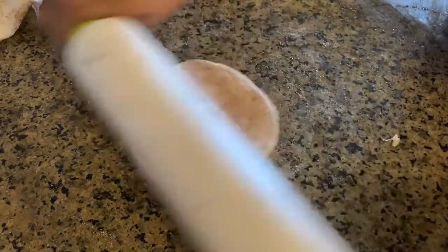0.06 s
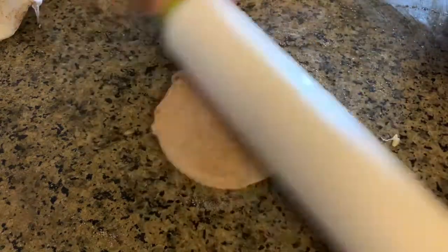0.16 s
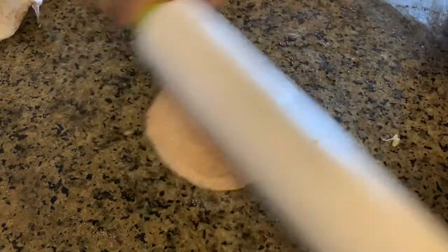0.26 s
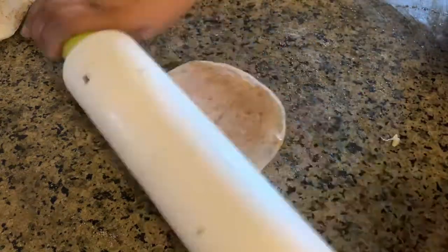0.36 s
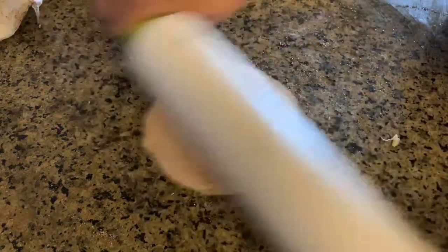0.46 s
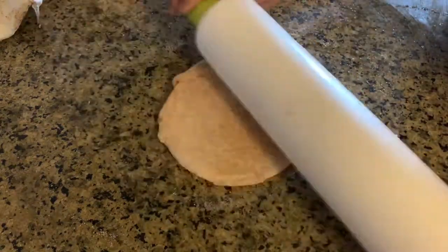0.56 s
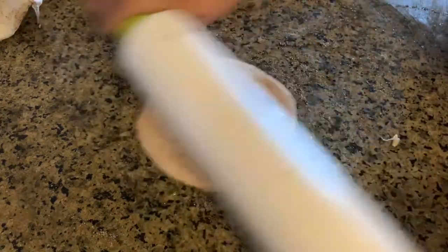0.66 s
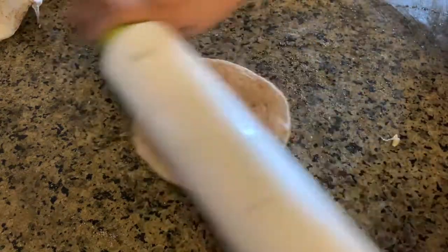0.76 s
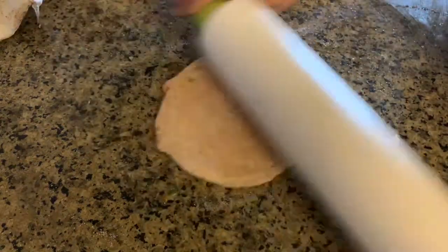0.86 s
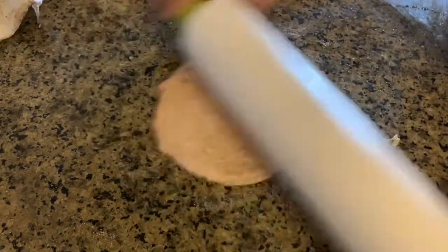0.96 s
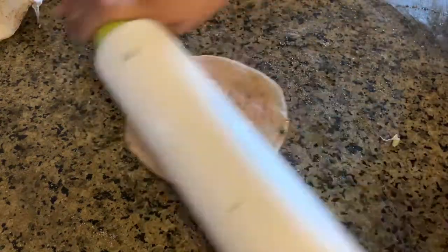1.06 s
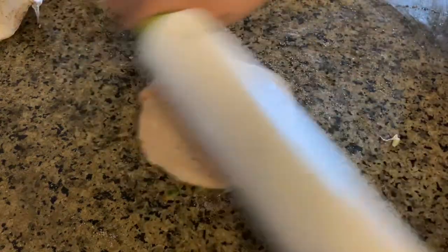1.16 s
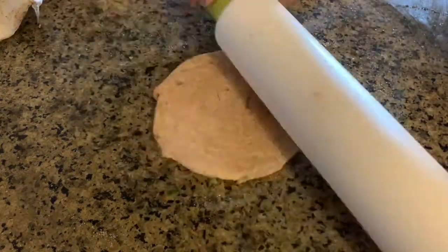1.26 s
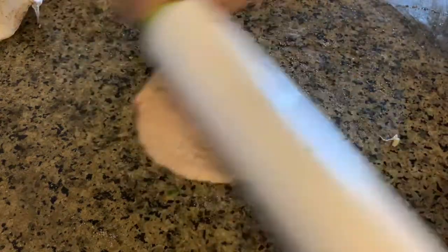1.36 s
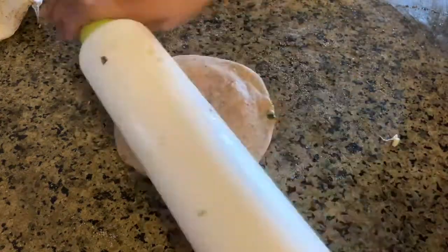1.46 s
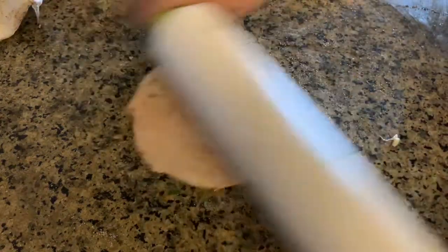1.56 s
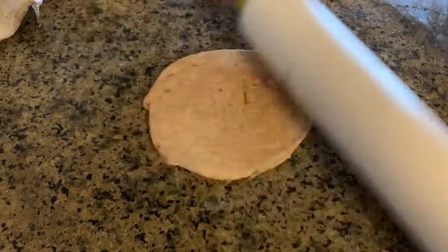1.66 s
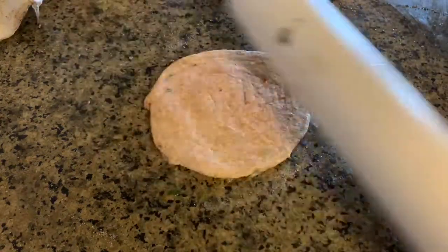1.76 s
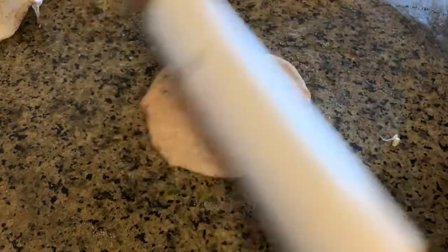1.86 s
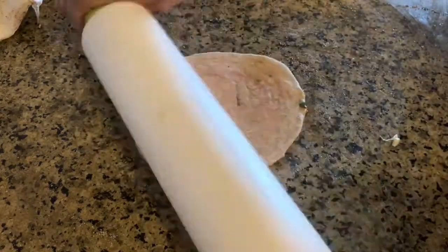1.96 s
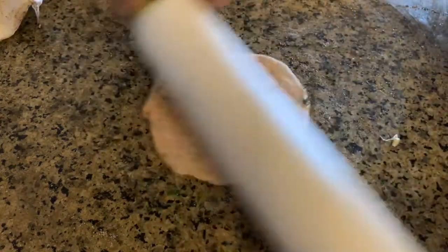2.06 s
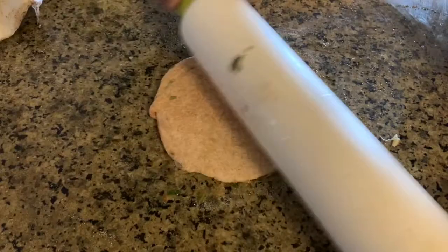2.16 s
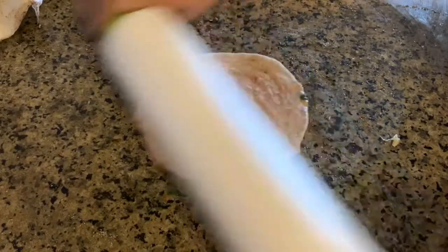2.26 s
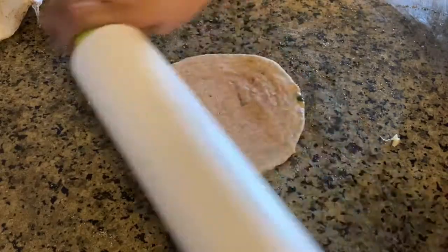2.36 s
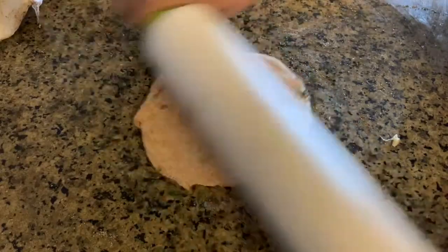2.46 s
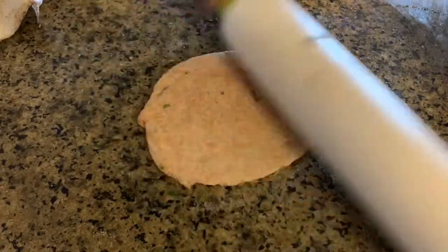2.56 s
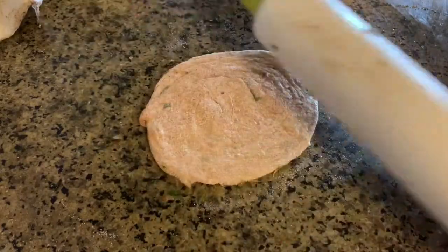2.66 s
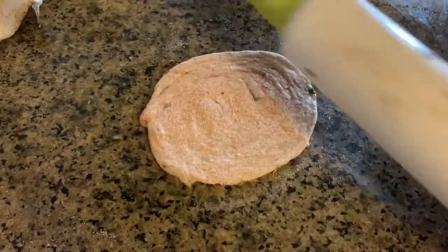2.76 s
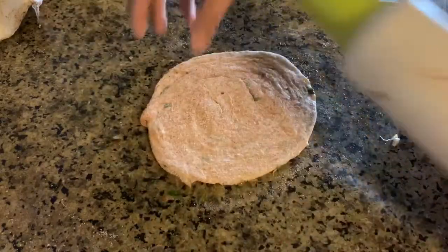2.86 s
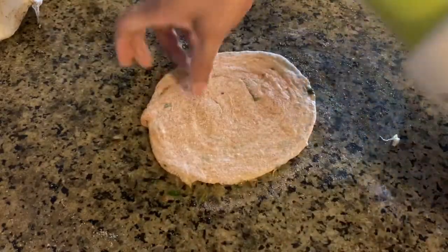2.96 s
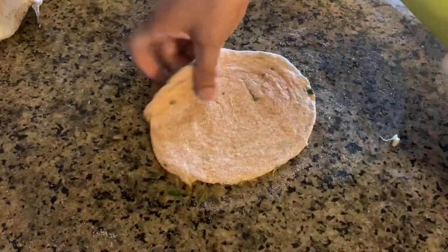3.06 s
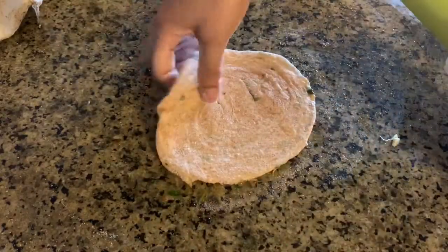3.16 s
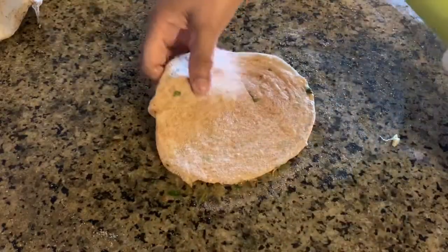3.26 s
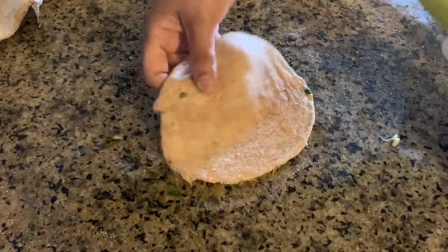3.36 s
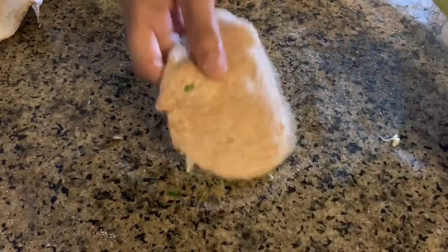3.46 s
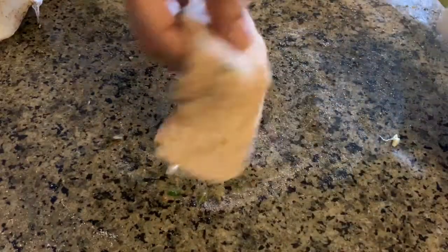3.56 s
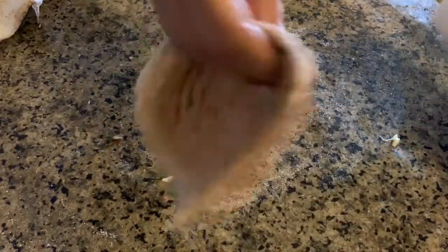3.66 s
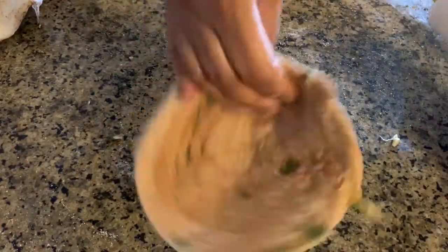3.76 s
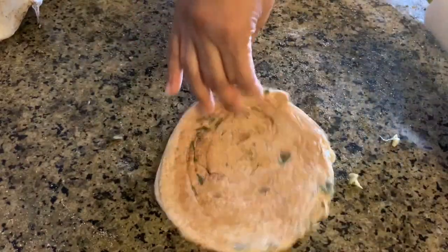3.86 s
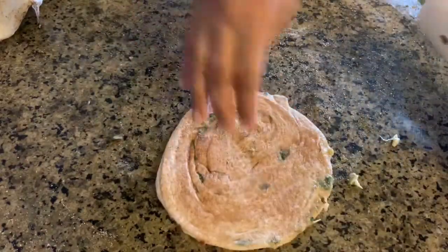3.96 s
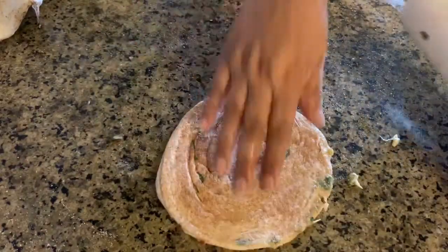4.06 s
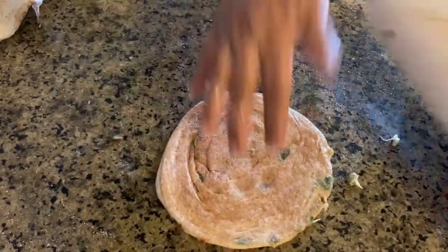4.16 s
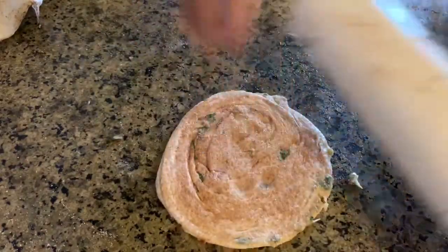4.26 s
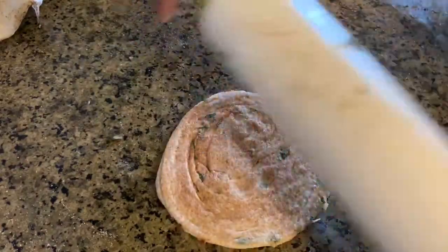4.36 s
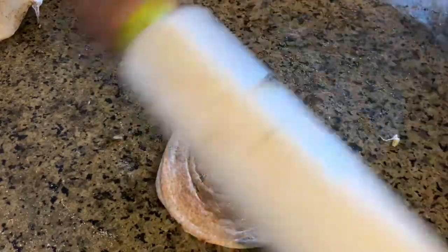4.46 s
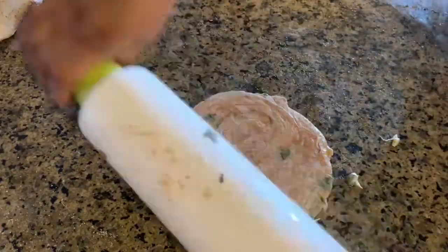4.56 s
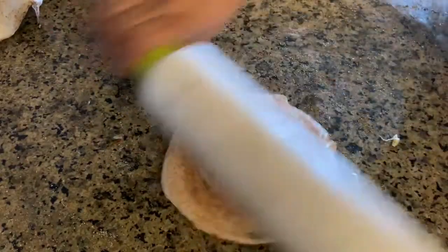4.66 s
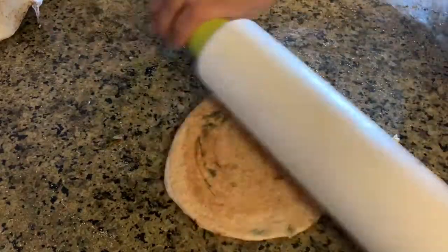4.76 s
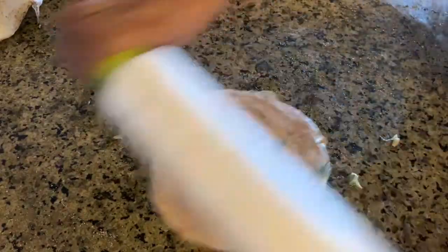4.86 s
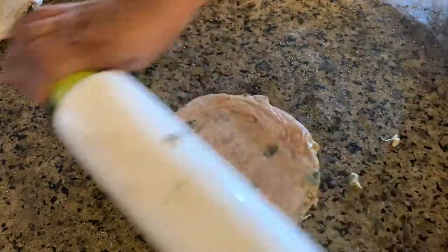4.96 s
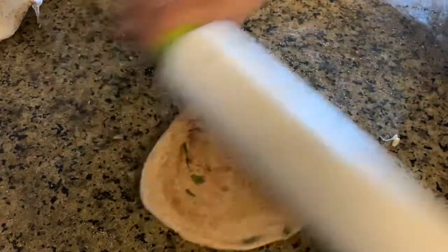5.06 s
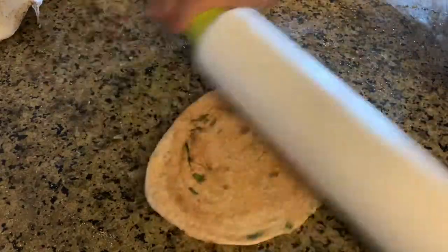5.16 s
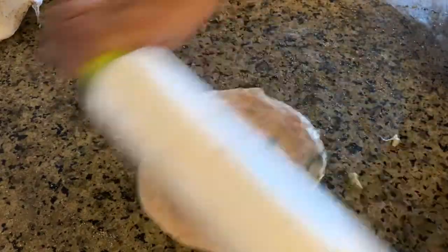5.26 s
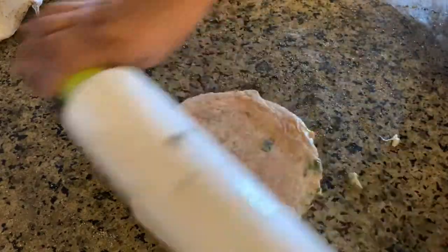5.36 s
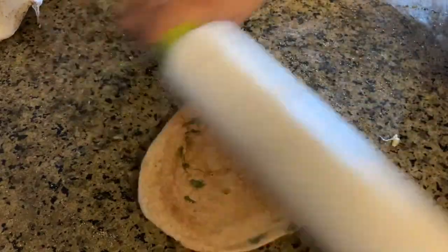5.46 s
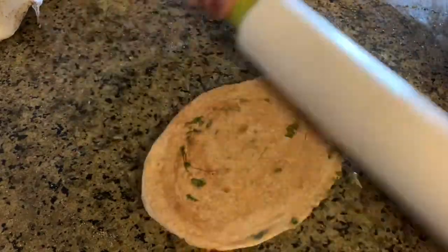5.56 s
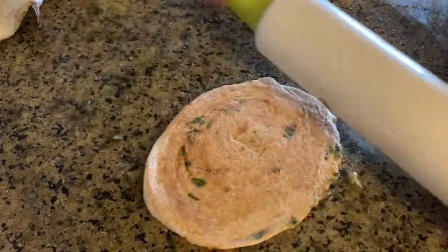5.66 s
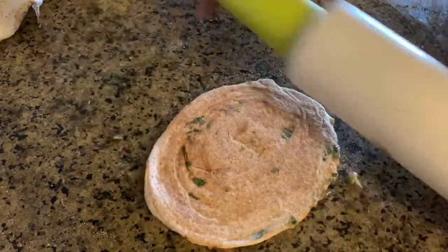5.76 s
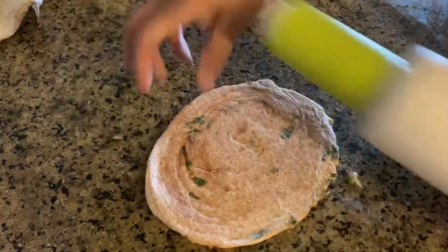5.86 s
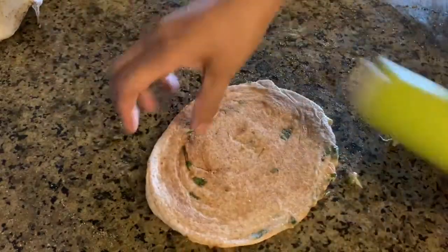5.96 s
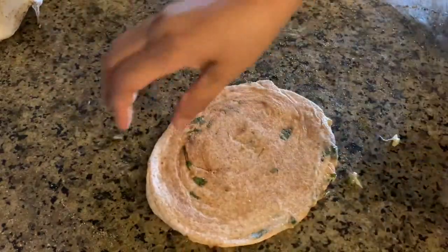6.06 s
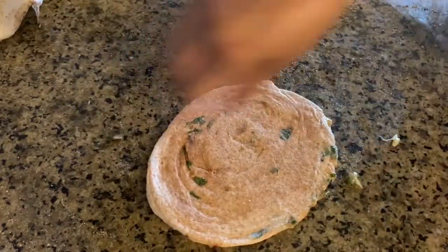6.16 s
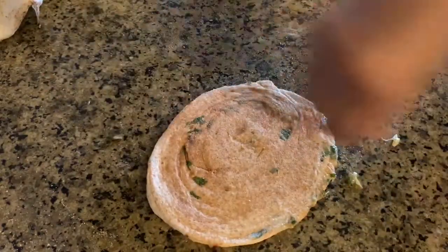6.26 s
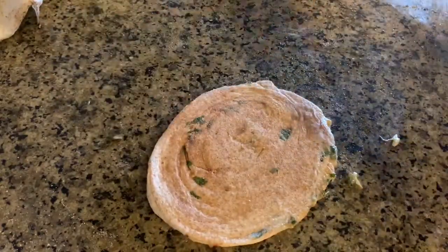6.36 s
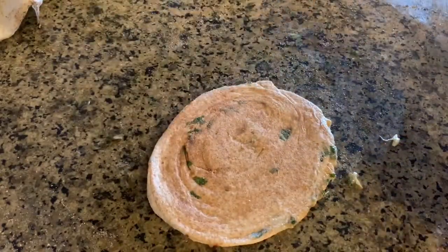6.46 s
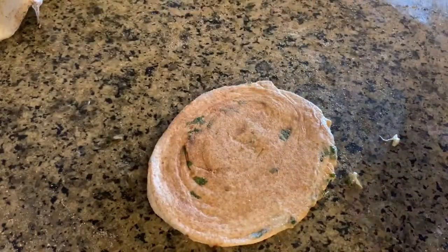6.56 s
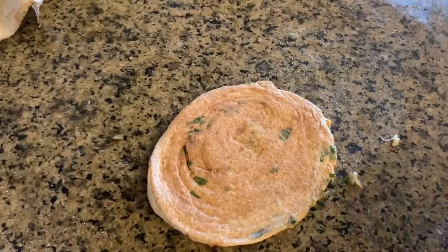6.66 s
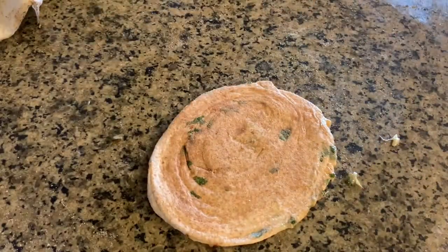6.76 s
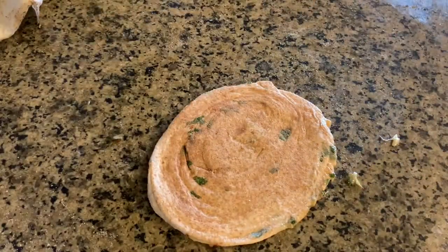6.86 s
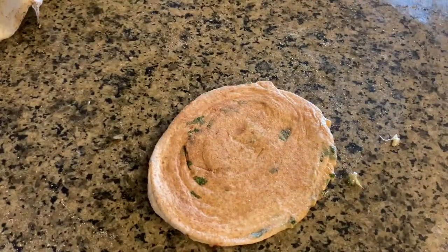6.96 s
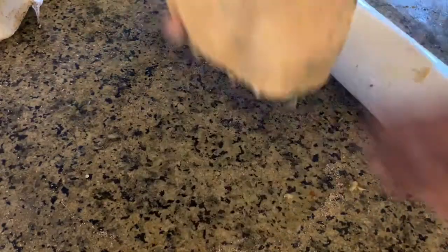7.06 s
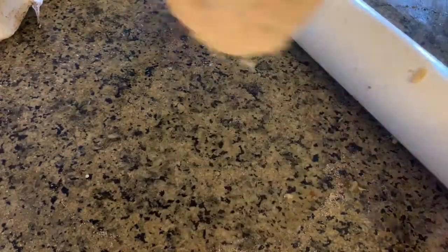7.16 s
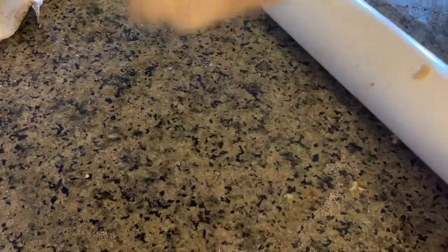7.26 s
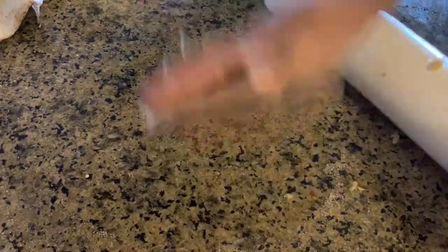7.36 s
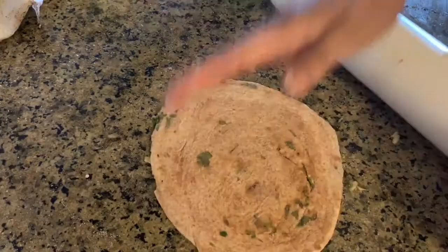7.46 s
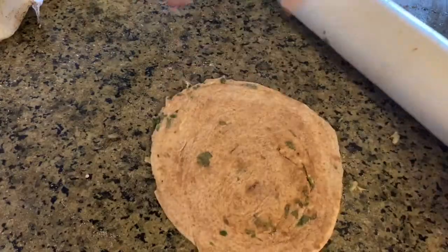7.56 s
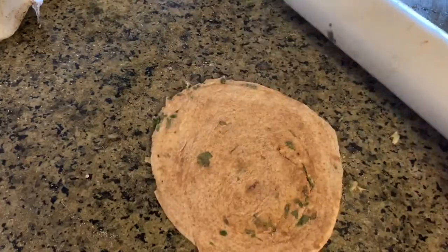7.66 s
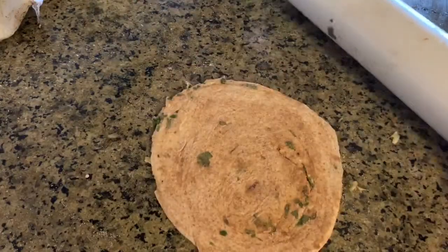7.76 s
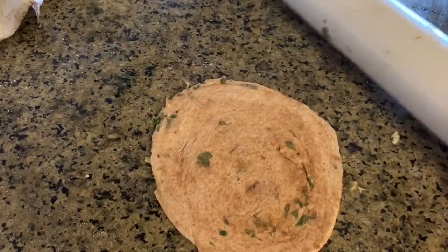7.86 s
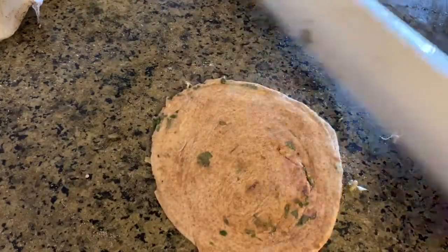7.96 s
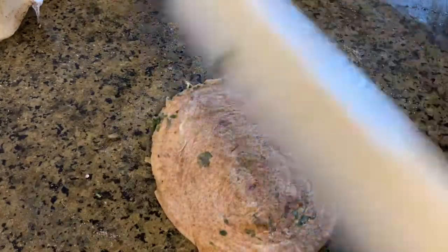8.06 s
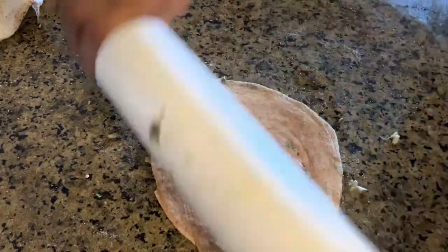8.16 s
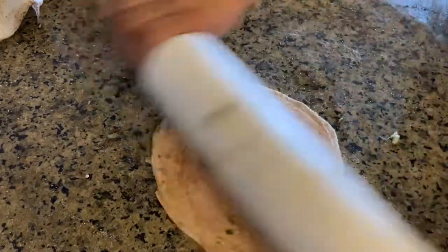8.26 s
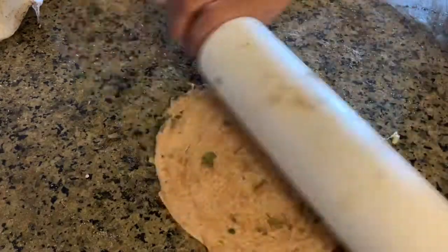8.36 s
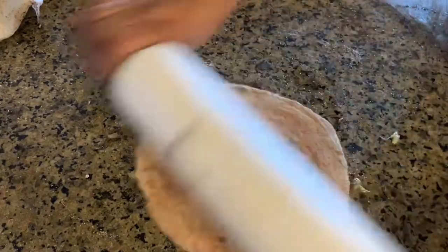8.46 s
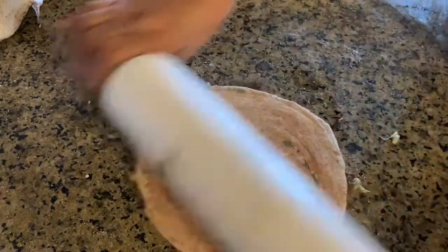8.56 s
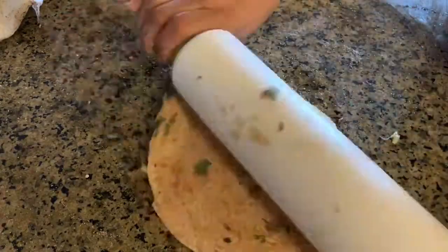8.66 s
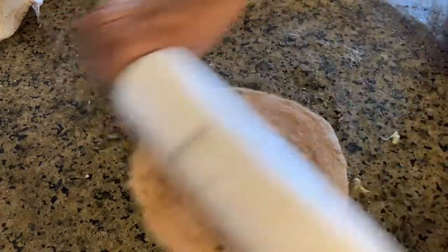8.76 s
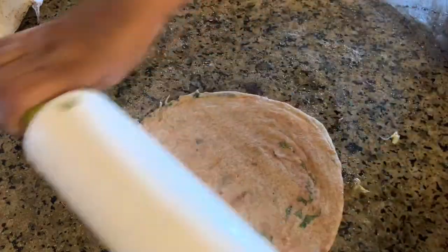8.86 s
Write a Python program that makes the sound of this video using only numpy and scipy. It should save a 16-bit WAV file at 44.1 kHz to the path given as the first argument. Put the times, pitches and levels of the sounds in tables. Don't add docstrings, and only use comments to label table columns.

```python
import sys
import numpy as np
from scipy import signal
from scipy.fft import rfft, irfft, next_fast_len
from scipy.io import wavfile
from scipy.ndimage import uniform_filter1d

SR = 44100
rng = np.random.default_rng(int(sys.argv[2]) if len(sys.argv) > 2 else 0)


def nominal_scale(level):
    x = np.asarray(level, float) / 20
    return 10 ** x


def put_to_file(sound):
    columns = np.atleast_2d(sound).T
    safe = np.clip(columns, -1, 1)
    whole_steps = np.round(safe * 32767)
    wavfile.write(sys.argv[1], SR, whole_steps.astype(np.int16))


N = 392490

# start_s, end_s, hiss_db
STROKES = [(-.1, 0.08, -49), (0.068, 0.237, -45), (0.235, 0.411, -47.5), (.41, 0.583, -47),
           (0.595, 0.767, -48.5), (0.767, 0.942, -45), (0.945, 1.129, -48.5), (1.124, 1.318, -44.5),
           (1.308, 1.509, -47.5), (2.016, 2.181, -46.5), (2.181, 2.381, -46.5), (4.403, 4.512, -57.5),
           (4.612, 4.794, -46), (4.802, 4.983, -45), (4.99, 5.182, -43), (5.173, 5.378, -46.5),
           (8.208, 8.378, -47), (8.372, 8.542, -46.5), (8.543, 8.7, -49), (8.7, 8.916, -46.5)]
# start_s, fastest_s, end_s, hiss_db
RUN_OUTS = [
    (1.508, 1.563, 1.812, -46),
    (1.869, 1.886, 2.01, -43.5),
    (2.402, 2.482, 2.665, -45.5),
    (2.57, 2.73, 2.81, -55.5),
    (5.386, 5.474, 5.695, -47),
    (5.58, 5.758, 5.785, -55.5),
    (7.724, 7.799, 7.835, -51.5),
]
# start_s, fastest_s, end_s, hiss_db
PEELS = [
    (2.7, 3.3, 4.7, -80),
    (3.7, 3.875, 4.1, -59),
    (4.48, 4.57, 4.95, -65.5),
    (7.265, 7.28, 7.42, -59.5),
    (7.8, 7.9, 8.9, -65.5),
]
# start_s, firmest_s, end_s, level_db
CONTACT = [
    (-.3, .6, 1.6, -55),
    (1.45, 1.69, 1.86, -50),
    (1.8, 2.1, 2.46, -54),
    (4.6, 4.78, 5.5, -53),
    (8.15, 8.43, 8.7, -53),
    (8.6, 8.9, 9.2, -53),
    (2.42, 2.61, 2.78, -53),
    (4.38, 4.45, 4.62, -70),
    (5.3, 5.63, 5.77, -52),
    (7.71, 7.83, 8.16, -59),
]
# start_s, heaviest_s, level_db
LUMPS = [(0.096, 0.162, -32), (0.483, 0.527, -28), (0.816, 0.889, -30), (1.129, 1.235, -30),
         (1.543, 1.607, -30.5), (1.67, 1.72, -48), (1.871, 1.898, -28.5), (2.097, 2.122, -31),
         (2.438, 2.466, -31), (3.851, 3.89, -41), (4.362, 4.415, -45.5), (4.616, 4.639, -38.5),
         (4.701, 4.74, -32), (4.89, 4.957, -45.5), (5.035, 5.102, -29.5), (5.334, 5.35, -45),
         (5.431, 5.485, -32.5), (7.43, 7.468, -33), (7.713, 7.745, -53), (7.853, 7.876, -36),
         (8.216, 8.234, -34.5)]
# pitch_hz, level_db (per Hz)
HISS = [(300, -21), (1400, -3), (1850, 4), (2300, -5.5), (2700, 0.5), (3100, -6), (3800, 0), (5000, -4),
        (7000, -1), (10000, -0.5), (13000, -2.5), (16000, -7)]
# pitch_hz, level_db (per Hz)
ROCKING = [(30, -50), (50, -4.5), (60, 6.5), (75, -3.5), (95, -2.5), (120, 0.5), (160, -7), (250, -19),
           (500, -43)]
# pitch_hz, level_db (per Hz)
CRUNCH = [(100, -24.5), (200, -1.5), (400, -0.5), (800, -9.5), (1500, -26.5)]
# pitch_hz, level_db, t60_s
SWAY = [(59.4, 0, 0.24)]
# pitch_hz, level_db, t60_s
BARREL = [(531.7, 4.5, 0.051), (647, 6, 0.014), (761, 4.5, 0.032), (918, 4.5, 0.034), (979, 2.5, 0.05),
          (1274, -3, 0.04), (1520, -9, 0.12), (1762, 5, 0.042), (1883, 3, 0.081), (2032, -6.5, 0.098)]
# pitch_hz, level_db, t60_s
FREE_BARREL = [(379, -9.5, 0.15), (598, -5, 0.4), (999, -6.5, 0.13), (1760, -24, 0.37), (2690, -12.5, 0.14)]
# start_s, low_modes_db, middle_modes_db, upper_modes_db (last two against low)
KNOCKS = [(0.11, -39.5, -9, -21), (0.486, -33, -6, -9), (0.887, -44, 2, -15), (1.553, -36.5, -12, -11),
          (1.722, -32, -6, -6.5), (1.748, -38.5, -24, -7), (1.797, -42.5, 9, 5), (1.884, -22, -0.5, 5.5),
          (2.118, -39, -1, -23), (2.441, -42.5, 0, -14), (2.575, -30, 5, -2.5), (2.634, -31.5, 3.5, 0.5),
          (4.38, -37, -8, -20), (4.446, -40, 9, -6), (4.617, -29.5, 0.5, 0), (4.697, -34.5, -3, -10),
          (5.1, -36, -2, -2), (5.6, -38.5, 9.5, 3.5), (5.654, -26, 4, 2), (7.737, -41, -0.5, -33),
          (7.845, -40.5, -1, 4.5), (7.91, -34, -9, -14), (8.075, -34.5, -1, -24), (8.215, -36.5, 1.5, 8)]
# start_s, level_db
RATTLES = [(0.158, -41.5), (0.272, -41), (0.294, -49.5), (0.576, -42), (0.772, -40.5), (0.84, -42),
           (1.239, -44), (1.691, -43.5), (2.221, -42), (2.615, -38), (3.004, -45.5), (5.428, -48),
           (5.499, -49), (8.625, -40)]
# start_s, barrel_ring_db, slab_ring_db
RINGS = [(0.156, -40.5, -47), (.294, -43.5, -43.5), (.577, -44.5, -54), (1.309, -50.5, -49),
         (1.56, -36, -40.5), (1.798, -46, -44.5), (1.9, -24.5, -27.5), (2.22, -41.5, -44.5),
         (2.636, -36, -42), (4.619, -34.5, -74), (5.12, -42.5, -59), (5.499, -41.5, -44),
         (5.659, -61, -37.5), (8.079, -51, -48)]
# pitch_hz, level_db, t60_s
SLAB_RING = [(121.8, 0, 0.85)]
# start_s, blow_db, centre_hz, tick_db, thud_db (last two against the blow)
SLAPS = [(3.724, -73, 441, 12.5, 3.5), (3.856, -41, 1260, 1, -3), (3.916, -43, 460, -7, 4.5),
         (4.104, -52.5, 1564, -10.5, -4), (4.145, -58, 1520, -3, -14.5), (6.037, -55.5, 1543, -18, 11),
         (6.388, -54.5, 2420, -54, 2.5), (6.495, -50, 453, -32, 5), (6.941, -54, 1220, -25, -18.5),
         (6.988, -50, 1160, -16.5, -16), (7.222, -47.5, 301, -17, 13.5), (7.4, -30, 890, -13.5, -4),
         (7.4344, -6, 750, -26.5, -28)]
# pitch_hz, level_db, t60_s
AIR_POCKET = [(551, -8.5, 0.054), (737, -3, 0.046), (957, 0.5, 0.012), (1045, -19.5, 0.22),
              (1273, 4.5, 0.013), (1460, -14.5, 0.15), (1484, 1, 0.025), (1421, -17, 0.2),
              (1710, -9, 0.053), (2070, -11, 0.06), (2230, -28, 0.099)]
# pitch_hz, level_db, t60_s
WORKTOP = [(58.6, -8, 0.62), (88, -10, 0.12), (121.9, 17, 0.96), (177, 18, 0.1), (217, -15, 0.12)]
# start_s, snap_db, body_db (against the snap)
SNAPS = [(0.486, -18.5, -22.5), (0.5498, -15.5, -8), (0.821, -27.5, -23), (0.8854, -31, 0),
         (1.883, -29.5, 18.5), (2.081, -27.5, -24), (2.13, -19.5, -21), (2.4409, -32, -1.5),
         (2.4832, -18, -11), (2.679, -56, -18), (3.8554, -32, 3), (4.3761, -37.5, -1.5), (4.6147, -25.5, 7),
         (4.698, -23.5, -17), (4.74, -29, -22), (4.9154, -29, 0), (5.017, -33, -19), (5.1063, -24.5, -8),
         (7.278, -48.5, -14), (7.401, -50.5, 21), (7.4348, -17.5, 2), (7.846, -32.5, 1),
         (8.2126, -35.5, -2)]
# start_s, level_db
THUMPS = [
    (0.112, -35),
    (0.486, -40),
    (1.133, -43.5),
    (1.554, -31.5),
    (2.445, -50),
    (3.856, -46),
    (4.617, -32.5),
    (7.852, -43),
    (8.213, -44.5),
]
# start_s, level_db
PATS = [(3.376, -46), (4.112, -36), (.54, -43), (1.27, -31), (1.61, -41), (2.14, -41), (2.49, -38),
        (4.751, -34), (5.113, -24.5), (5.5, -39), (7.227, -35.5), (7.438, -26)]
# start_s, level_db, pitch_hz, edge_db (against level)
BUMPS = [(0.189, -36, 604, -8), (0.219, -46, 598, -13), (0.519, -33, 277, -11), (0.545, -41, 265, 1),
         (0.815, -39, 324, -9), (0.844, -35, 363, -13), (0.871, -32, 272, -14), (0.909, -39, 252, -17),
         (0.947, -38, 608, -14), (1.132, -41, 318, -12), (1.164, -35.5, 541, -13), (1.2, -38, 334, -12),
         (1.23, -31.5, 340, -19), (1.269, -39, 385, -12), (1.313, -51, 310, -11), (1.6, -33, 361, -14.5),
         (1.639, -35, 256, -15), (1.697, -37, 252, -12.5), (1.769, -45, 590, 2), (1.919, -24.5, 595, -11),
         (2.084, -43, 514, -12), (2.192, -43, 528, -8), (2.481, -35, 950, -8), (2.519, -44, 261, -4),
         (4.719, -31, 253, -12), (4.76, -41, 302, -16), (4.819, -40, 494, -3), (4.918, -37, 944, -5),
         (5.052, -40, 450, -10), (5.079, -30, 327, -17), (5.127, -34, 598, -23), (5.269, -45, 606, -1),
         (5.469, -37.5, 307, -18), (5.486, -35.5, 304, -18), (8.215, -27.5, 422, 1), (8.31, -39, 966, -10),
         (8.395, -54, 517, 3), (8.438, -41, 517, 0), (8.562, -44.5, 323, -16), (8.738, -54, 487, 3)]
# start_s, strongest_s, end_s, level_db
RUSTLES = [(2.97, 3.006, 3.18, -68), (3.1, 3.16, 3.2, -76), (3.22, 3.275, 3.23, -66.5),
           (3.5, 3.65, 3.5, -85), (6.02, 6.13, 6.28, -67), (6.36, 6.385, 6.41, -68),
           (6.49, 6.51, 6.67, -60), (6.6, 6.67, 6.87, -62.5), (6.8, 6.83, 6.93, -59),
           (6.88, 6.99, 7.015, -56.5), (7.21, 7.285, 8.2, -66), (7.39, 7.44, 7.62, -51),
           (7.84, 7.85, 8.02, -50.5), (7.85, 7.89, 8.5, -64)]
# pitch_hz, level_db (per Hz)
RUSTLE = [(500, -0.5), (1200, 8), (2500, 3.5), (5000, 0), (7500, -7.5), (11000, -10), (16000, -19)]
# start_s, strongest_s, end_s, level_db
HANDLING = [
    (1.33, 1.43, 1.54, -56),
    (2.95, 3.05, 3.35, -65.5),
    (3.52, 3.65, 3.96, -67.5),
    (4.4, 4.5, 4.3, -59),
    (5.24, 5.3, 5.36, -52.5),
    (6.3, 6.38, 7.3, -75),
    (7.22, 7.3, 7.4, -59.5),
    (7.5, 7.58, 8.4, -66),
    (8.05, 8.15, 8.22, -62),
    (7.424, 7.435, 7.59, -40),
]
# pitch_hz, level_db (per Hz)
DULL = [(120, -7), (250, -1.5), (600, 1.5), (1200, -6.5), (2500, -27), (6000, -34.5)]
# start_s, strongest_s, end_s, level_db
SIFTS = [
    (2.65, 2.75, 2.9, -73),
    (2.95, 3.12, 3.25, -73),
    (3.25, 3.35, 3.9, -83),
    (3.6, 3.75, 3.85, -58),
    (5.55, 5.75, 5.8, -60),
    (7.6, 7.63, 7.66, -65),
    (7.71, 7.76, 7.3, -60),
    (7.152, 7.156, 7.17, -61),
    (7.385, 7.42, 7.44, -50),
]
# pitch_hz, level_db (per Hz)
FINE = [(4000, -28), (8000, -8), (11000, 1), (16000, -1)]
# pitch_hz, t60_s
ROOM = [(100, 0.14), (500, 0.34), (1500, 0.41), (4000, 0.39), (12000, 0.15)]
# pitch_hz, level_db (per Hz)
KITCHEN = [(18, -36.5), (30, 1.5), (124, -3), (245, -17.5), (355, -10), (600, -23.5), (1300, -21.5),
           (3500, -44), (16000, -47)]
# pitch_hz, likeness (0-1)
LIKENESS = [(60, 0.98), (200, 0.9), (600, 0.34), (1500, 0.17), (2300, 0.4), (3500, 0.11), (5500, 0),
            (7000, 0.84), (9000, 0.98), (15000, 0.99)]
# pitch_hz, left_over_right_db
LEFT_OVER_RIGHT = [(60, 2.5), (130, 0.5), (290, -1), (640, 4.5), (1410, 1), (3100, -0.5), (6820, -2),
                   (15000, 1)]
# pitch_hz, phase_rad
LOW_PHASE = [(0, 0), (250, 0), (2300, -3.1), (3500, -5.3), (5000, -8.3), (5600, -8.0), (6000, -6.3)]

FASTEST, CREEP_DB = 0.53, -16
SETTLE_S, SETTLE_PER_RISE = 0.056, 0.8
REST_DB, ROLL_DB = -64.5, 2
RATTLE_MIDDLE_DB, RATTLE_UPPER_DB = -5, -17
SLAP_S = 0.036
POP_LAG_S, POP_RIGHT_DB = 0.00022, -2.5
BURST_S, BURST_DB, BURST_HZ, BURST_T60_S = 7.4365, 2.5, 1180, 0.013
BUMP_CYCLES = 13.4
KITCHEN_DB, WHINE_DB, WHINE_HZ = -62.5, -89, 5184
PORT_DELAY_S, IN_PHASE_HZ = 9 / SR, 6000
EDGE_HZ = 15900
DROPOUT_S, DROPOUT_WIDTH_S, DROPOUT_DB = 7.014, 0.007, -24


def evened(x):
    return x / np.sqrt(np.mean(x ** 2) + 1e-20)


def read(points, hz):
    f, value = np.transpose(points)
    return np.interp(np.log(hz + 1), np.log(f + 1), value)


def add(mix, s, sound):
    part = mix[:, round(s * SR):][:, :sound.shape[1]]
    part += sound[:, :part.shape[1]]


def coloured(x, points):
    size = next_fast_len(N)
    gain = nominal_scale(read(points, np.fft.rfftfreq(size, 1 / SR)))
    return evened(irfft(rfft(x, size) * gain, size)[:, :N])


def rung(modes, seconds, lift_db=0, scatter_db=0., detune=0., apart=3):
    hz, db, t60 = np.transpose(modes)[:, :, None]
    pitch_chance, level_chance, phase_chance = rng.standard_normal((3, 2, len(modes), 1))
    t = np.arange(round(seconds * SR)) / SR
    turns = hz * (1 + detune * pitch_chance[0]) * t
    decay = nominal_scale(db + scatter_db * level_chance - 60 * t / t60)
    phase = phase_chance[:, :, None].reshape(2, len(modes), 1) * [[[0.4]], [[apart]]]
    rings = decay * np.sin(2 * np.pi * turns + phase)
    rings *= np.minimum(t / 0.00096, 1)
    return (rings * nominal_scale(lift_db)).sum(1) / abs(rings.sum(1)).max()


def crack(t60, lo_hz, hi_hz):
    t = np.arange(round(0.25 * SR)) / SR
    band = signal.butter(2, [lo_hz, min(hi_hz, 20000)], "band", fs=SR, output="sos")
    noise = evened(signal.sosfilt(band, rng.standard_normal((2, len(t)))))
    return noise * nominal_scale(-2.5 - 60 * t / t60) * np.minimum(t * lo_hz / 1.5, 1)


def slips(per_s, spread_db, share, size):
    flicker = evened(uniform_filter1d(rng.standard_normal(N), 250))
    strength = nominal_scale(spread_db * np.minimum(rng.exponential(1, N), 3))
    grit = strength * (rng.random(N) < per_s / SR)
    grains = evened(uniform_filter1d(grit, size))
    return rng.standard_normal((2, N)) * (nominal_scale(2.0 * flicker) + share * grains)


def swells(rows, rise, fall, creep_db=-90):
    out = np.zeros(N)
    for start, top, end, db in rows:
        first, last = np.clip([round(start * SR), round(end * SR)], 0, N)
        now = np.arange(first, last) / SR
        up = np.sin(np.pi / 2 * np.clip((now - start) / max(top - start, 1e-3), 0, 1)) ** rise
        down = np.sin(np.pi / 2 * np.clip((end - now) / max(end - top, 1e-3), 0, 1)) ** fall
        out[first:last] += nominal_scale(db) * (nominal_scale(creep_db) + up * down)
    return out


def falling_sweep(t, hz, attack):
    sweep = np.sin(2 * np.pi * np.cumsum(hz) / SR) * np.minimum(attack, 1) * nominal_scale(-60 * t / 0.35)
    return np.array([sweep, sweep])


def at_ports(pop):
    return np.array([pop, nominal_scale(POP_RIGHT_DB) * np.roll(pop, round(POP_LAG_S * SR))])


def strokes():
    turning = [(a, a + FASTEST * (b - a), b, db) for a, b, db in STROKES]
    sliding = swells(turning + RUN_OUTS, 1.63, 1.67, CREEP_DB) + swells(PEELS, 5.3, 4.9)
    drive = swells(CONTACT, 1, 0.87)
    settling = [(a, b, b + SETTLE_S + SETTLE_PER_RISE * (b - a), db) for a, b, db in LUMPS]
    weight = swells(settling, 1.1, 3.1) + nominal_scale(ROLL_DB) * drive + nominal_scale(REST_DB)

    hiss = nominal_scale(3) * sliding * coloured(slips(1600, 1.2, 0.2, size=12), HISS)

    push = drive * slips(150, 5, 0.5, size=60)
    shell = rung(BARREL, 1) + nominal_scale(-16.5) * rung(FREE_BARREL, 1)
    shell /= np.linalg.norm(shell[0])
    wide = signal.sosfilt(signal.butter(2, [200, 2200], "band", fs=SR, output="sos"), push)
    barrel = nominal_scale(-3.5) * signal.oaconvolve(push, shell, axes=1)[:, :N] + nominal_scale(3.0) * wide

    lumps = coloured(rng.standard_normal((2, N)), ROCKING)
    lumps /= np.sqrt(uniform_filter1d(lumps[:1] ** 2, 2500) + 0.04)
    crunch = coloured(slips(200, 2.5, 1.5, size=90), CRUNCH)
    cabinet = rung(SWAY, 0.5)[:1]
    cabinet /= abs(cabinet).sum()
    sway = signal.oaconvolve(weight * lumps, cabinet, axes=1)[:, :N]
    return hiss + barrel + weight * (nominal_scale(-2.5) * lumps + nominal_scale(-19) * crunch) + sway


def knocks():
    out, hz = np.zeros((2, N)), np.array(BARREL)[:, :1]
    rattles = [(s, db, RATTLE_MIDDLE_DB, RATTLE_UPPER_DB) for s, db in RATTLES]
    for s, db, middle_db, upper_db in KNOCKS + rattles:
        lift_db = np.where(hz < 800, 0, np.where(hz < 1400, middle_db, upper_db))
        add(out, s, nominal_scale(db + 11) * rung(BARREL, 0.18, lift_db, 0.76, 0.024))
        add(out, s, nominal_scale(db + max(middle_db, upper_db) - 9) * crack(0.04, 500, 2100))
        middle_tail = nominal_scale(db + middle_db - 14) * crack(0.15, 600, 1150)
        upper_tail = nominal_scale(db + upper_db - 17) * crack(0.22, 1400, 2150)
        add(out, s + 0.006, middle_tail + upper_tail)
    for s, barrel_db, slab_db in RINGS:
        add(out, s, nominal_scale(barrel_db) * rung(FREE_BARREL, 0.6, detune=0.003, apart=0.33))
        add(out, s, nominal_scale(slab_db) * rung(SLAB_RING, 0.83))
    return out


def slaps():
    out = np.zeros((2, N))
    for s, db, hz, tick_db, thud_db in SLAPS:
        add(out, s, nominal_scale(db - 3) * crack(SLAP_S, hz / 1.5, hz * 1.66))
        pop = nominal_scale(db + 0.5) * rung(AIR_POCKET, 0.4, detune=0.0045)[0]
        add(out, s + 0.0018, at_ports(pop))
        tail = crack(0.36, 1370, 1500) + nominal_scale(-7.5) * crack(0.3, 2100, 2270)
        add(out, s + 0.008, nominal_scale(db - 22.5) * tail)
        add(out, s, nominal_scale(db + tick_db + 1.0) * crack(1.9 * SLAP_S, 5200, 11000))
        add(out, s + 0.0042, nominal_scale(db + thud_db - 7.0) * rung(WORKTOP, 0.78))
    return out


def burst():
    out, t = np.zeros((2, N)), np.arange(SR // 50) / SR
    envelope = nominal_scale(BURST_DB - 60 * t / BURST_T60_S) * np.minimum(t * BURST_HZ * 1.4, 1)
    add(out, BURST_S, at_ports(envelope * np.sin(2 * np.pi * BURST_HZ * t)))
    return out


def snaps():
    out = np.zeros((2, N))
    for s, db, body_db in SNAPS:
        edge, fizz = crack(0.015, 3500, 18000), crack(0.07, 2000, 15000)
        add(out, s, nominal_scale(db - 3.0) * (edge + nominal_scale(-8.5) * fizz))
        add(out, s, nominal_scale(db + body_db - 10.0) * crack(0.074, 1200, 2690))
    return out


def thumps():
    out, t = np.zeros((2, N)), np.arange(SR // 10) / SR
    sweep = falling_sweep(t, 85 + 800 * np.exp(-t / 0.0052), t / 0.015 + 0.19)
    for s, db in THUMPS:
        add(out, s, nominal_scale(db + 0.5) * sweep)
    return out


def pats():
    out, t = np.zeros((2, N)), np.arange(SR // 4) / SR
    sweep = falling_sweep(t, 61 + 110 * np.exp(-t / 0.0082), t / 0.0052)
    for s, db in PATS:
        add(out, s, nominal_scale(db) * sweep)
    return out


def bumps():
    out = np.zeros((2, N))
    for s, db, hz, edge_db in BUMPS:
        t60 = BUMP_CYCLES / hz
        add(out, s, nominal_scale(db - 1.5) * rung([(hz, 0, t60), (1.3 * hz, -7, t60)], 0.08, apart=1.2))
        add(out, s, nominal_scale(db + edge_db - 3.5) * crack(0.025, 1200, 2400))
    return out


def rustles():
    return nominal_scale(-2.5) * swells(RUSTLES, 0.58, 3.3) * coloured(slips(450, 3.5, 0.067, size=20), RUSTLE)


def handling():
    dull = swells(HANDLING, 1.3, 3.8) * coloured(slips(120, 2.3, 0.47, size=80), DULL)
    return dull + swells(SIFTS, 1.2, 2.9) * coloured(slips(450, 2.7, 0.1, size=12), FINE)


def room(x):
    hz, t, z = signal.stft(rng.standard_normal((2, SR // 2)), SR, nperseg=256)
    decay = nominal_scale(-60 * t / read(ROOM, hz)[:, None])
    tail = signal.istft(z * decay, SR, nperseg=256)[1]
    tail *= np.arange(tail.shape[1]) > 0.006 * SR
    return signal.oaconvolve(x, tail / np.linalg.norm(tail[0]), axes=1)[:, :N]


def kitchen():
    tone = coloured(rng.standard_normal((2, N)), KITCHEN)
    hum = coloured(rng.standard_normal((2, N)), ROCKING)
    swell = evened(uniform_filter1d(uniform_filter1d(rng.standard_normal(N), 3000), 3000))
    whine = nominal_scale(WHINE_DB - 3.5 + 3 * swell) * np.sin(2 * np.pi * WHINE_HZ * np.arange(N) / SR)
    return nominal_scale(KITCHEN_DB + 3.8 * swell) * (tone + nominal_scale(-4.0) * hum) + whine


def scene():
    rolling = strokes() + rustles()
    blows = knocks() + slaps() + burst() + snaps() + thumps() + pats()
    small = bumps() + handling()
    echoes = nominal_scale(-12.5) * room(blows) + nominal_scale(-15.0) * room(rolling) + nominal_scale(-13) * room(small)
    return rolling + blows + small + echoes + kitchen()


def band_limit(x):
    return signal.sosfilt(signal.butter(12, 17110, fs=SR, output="sos"), x)


def record(dry):
    from_dip = (np.arange(N) / SR - DROPOUT_S) / DROPOUT_WIDTH_S
    dip = nominal_scale(DROPOUT_DB * np.exp(-from_dip ** 2))
    hz, (left, twin) = np.fft.rfftfreq(N, 1 / SR), rfft(dry * dip)
    same = np.clip(read(LIKENESS, hz), 0, 1)
    low_phase = np.interp(hz, *np.transpose(LOW_PHASE))
    high_phase = 2 * np.pi * (hz - IN_PHASE_HZ) * PORT_DELAY_S
    phase = np.where(hz < IN_PHASE_HZ, low_phase, high_phase)
    right = same * left * np.exp(1j * phase) + np.sqrt(1 - same ** 2) * twin
    tilt = nominal_scale(read(LEFT_OVER_RIGHT, hz) / 2)
    low_cut = 1 / np.sqrt(1 + (50 / (hz + 1)) ** 9)
    top_cut = np.where(hz < EDGE_HZ, 1, nominal_scale(-38.5))
    mix = irfft(np.array([left * tilt, right / tilt]) * low_cut * top_cut, N)
    return band_limit(mix)


dry = scene()
out = record(dry)
put_to_file(out)
```